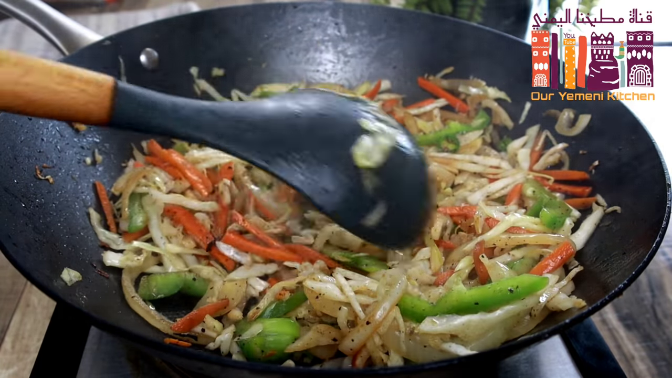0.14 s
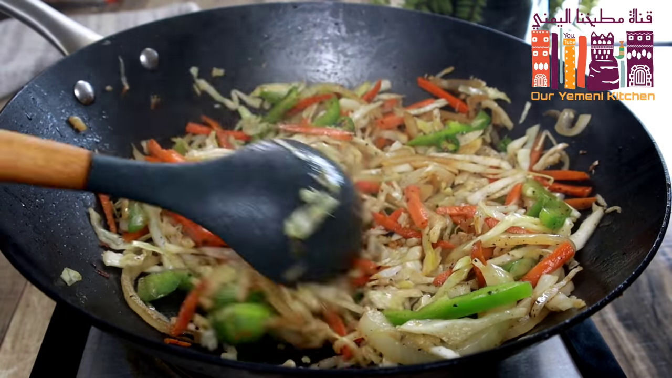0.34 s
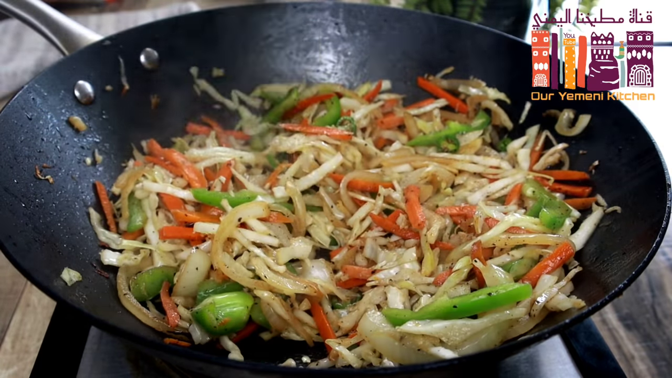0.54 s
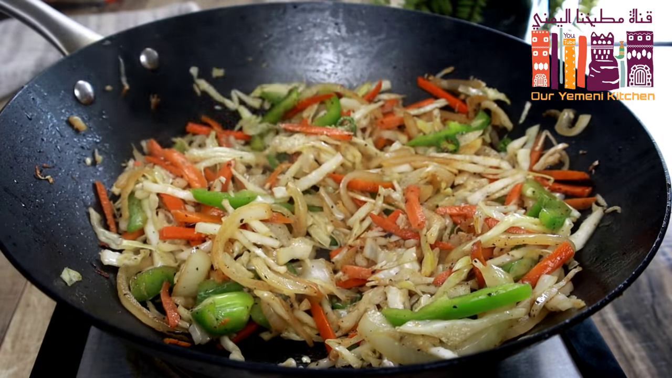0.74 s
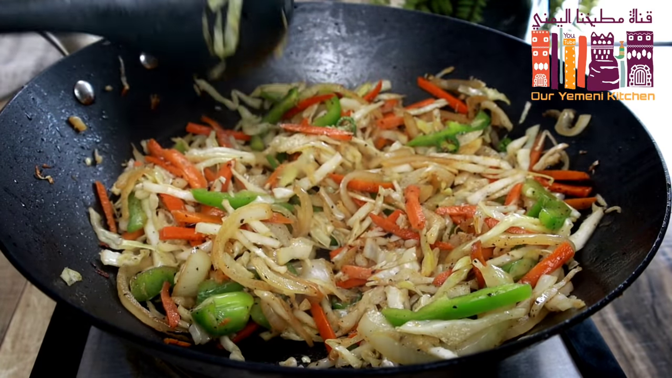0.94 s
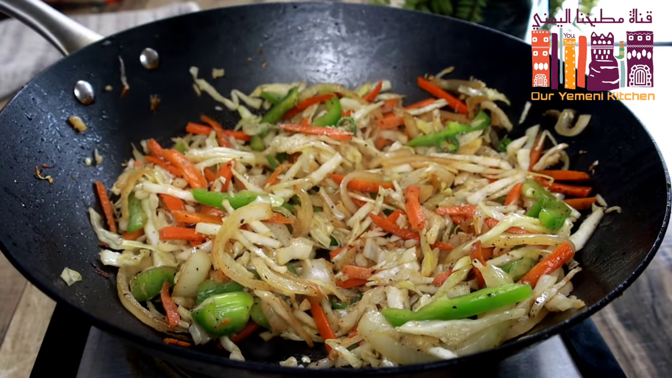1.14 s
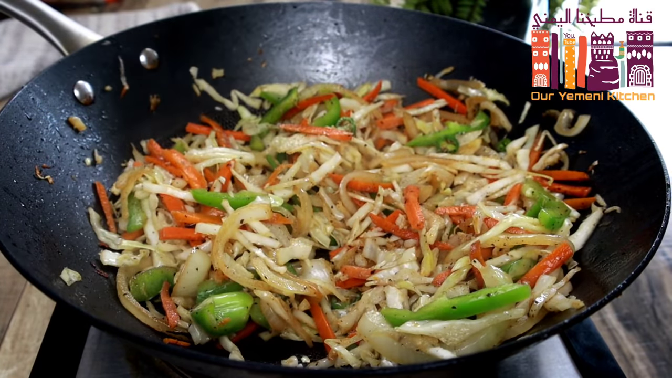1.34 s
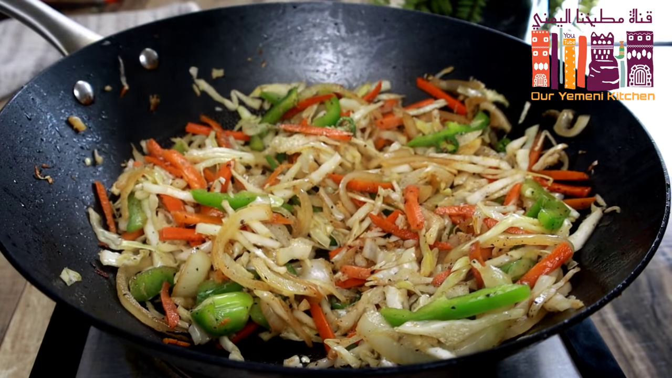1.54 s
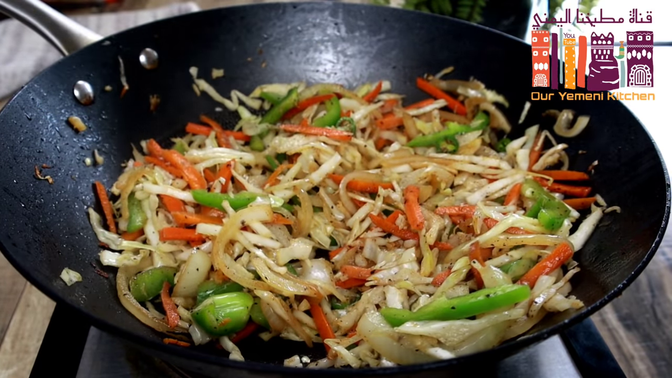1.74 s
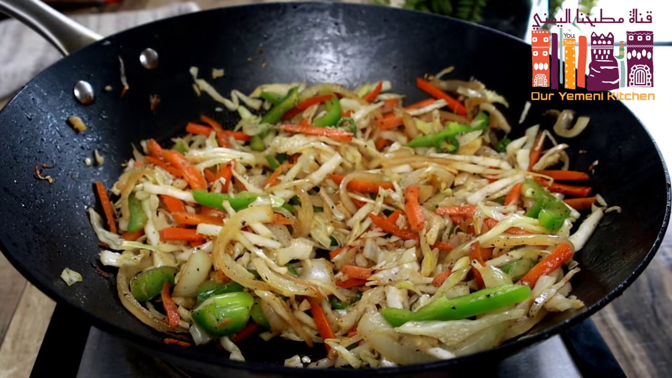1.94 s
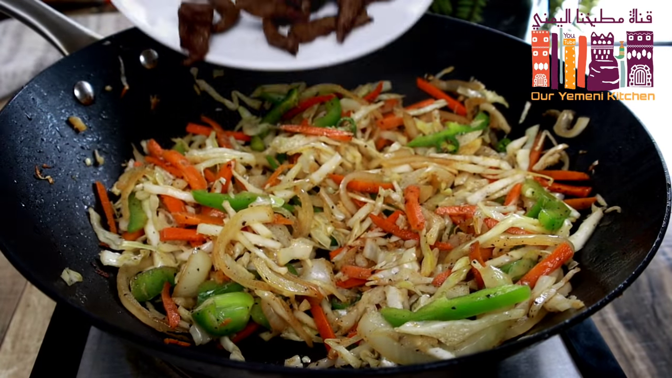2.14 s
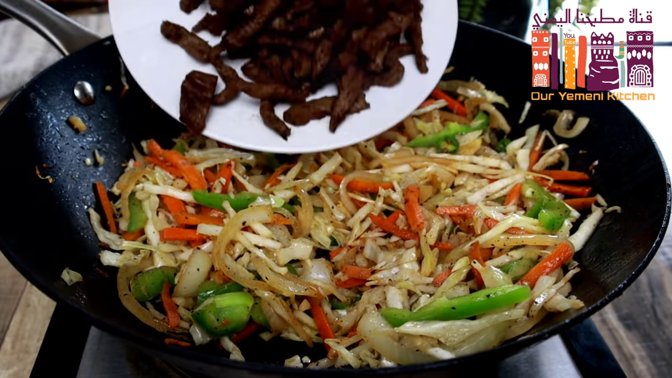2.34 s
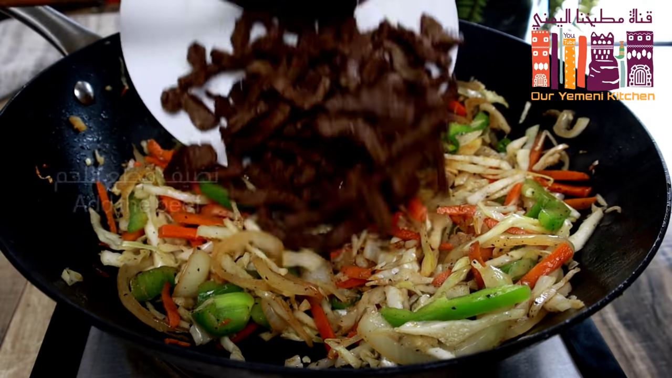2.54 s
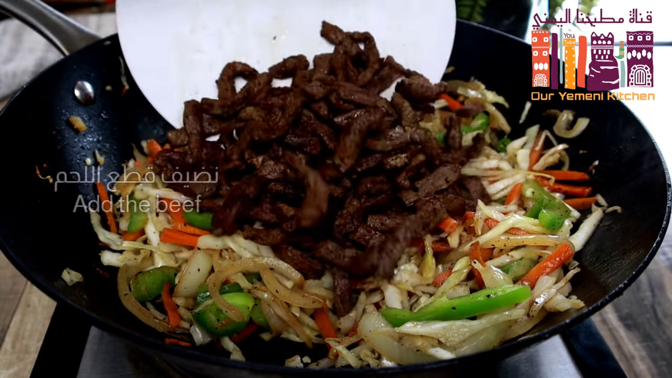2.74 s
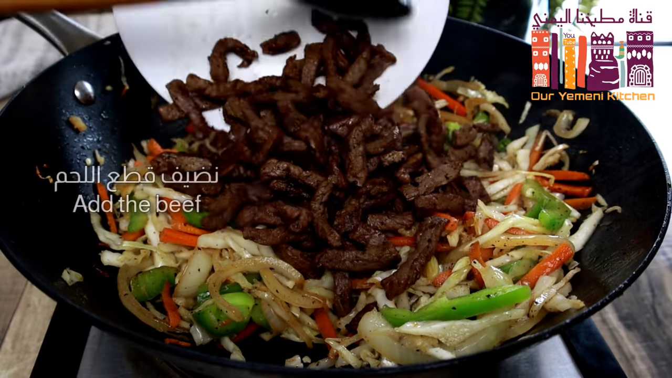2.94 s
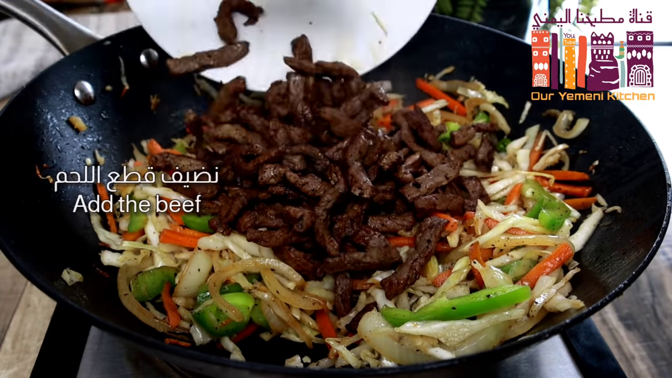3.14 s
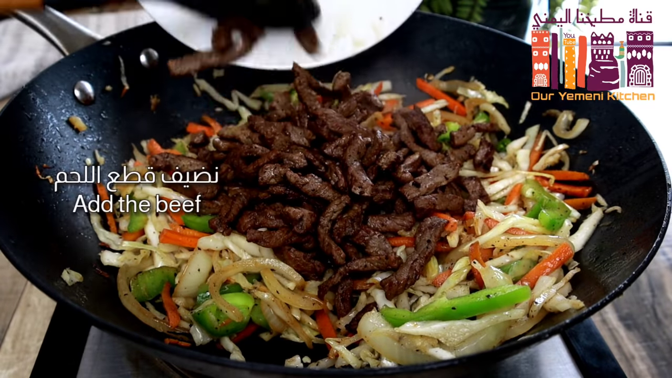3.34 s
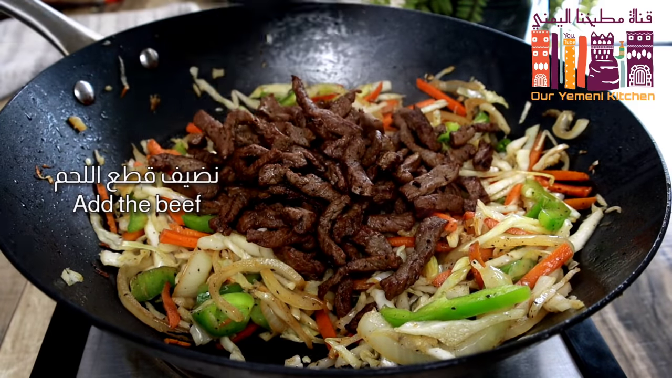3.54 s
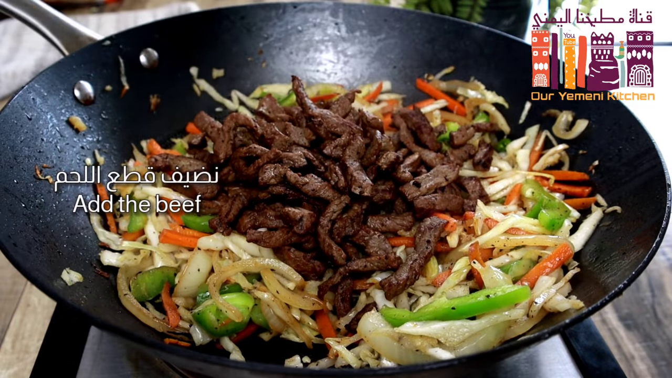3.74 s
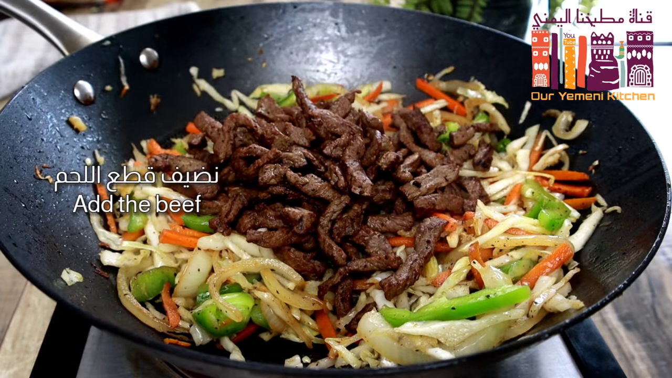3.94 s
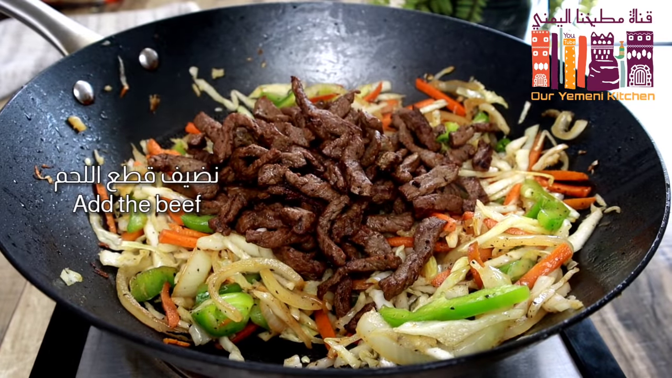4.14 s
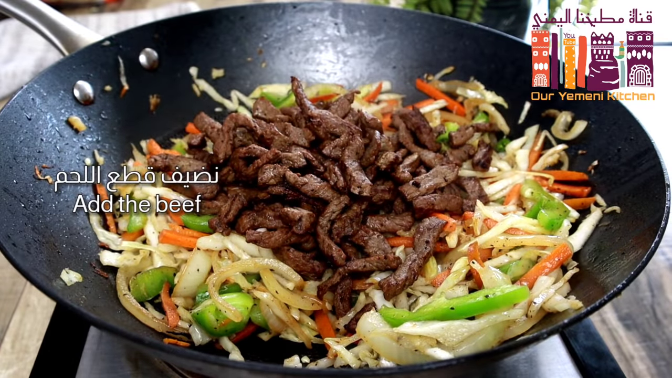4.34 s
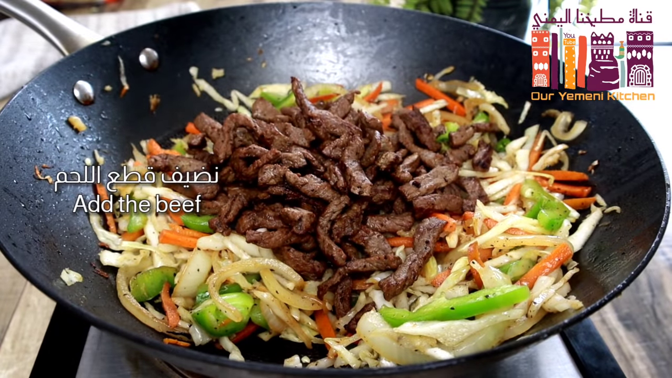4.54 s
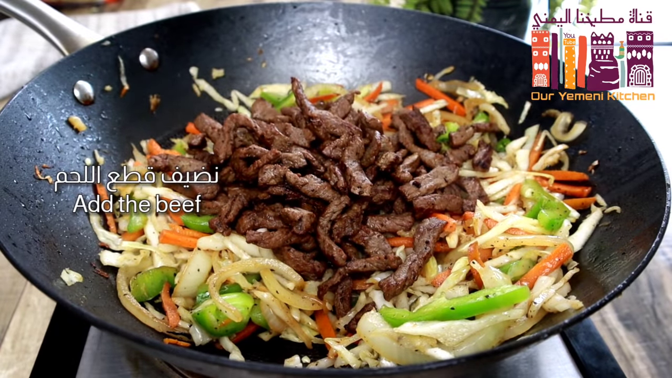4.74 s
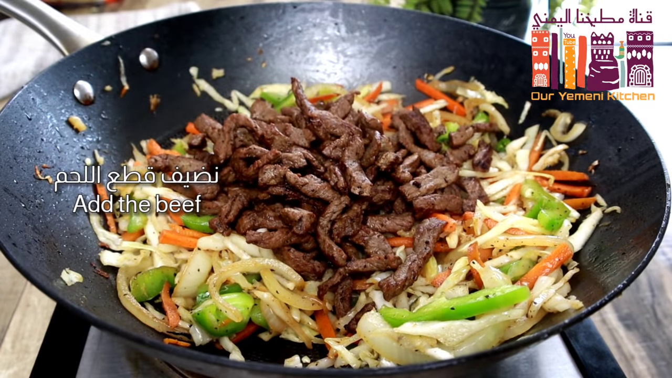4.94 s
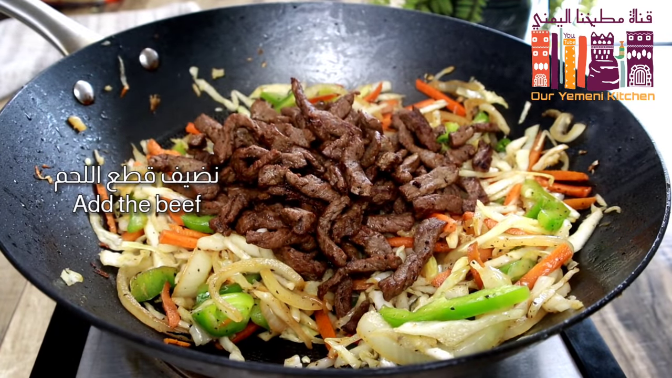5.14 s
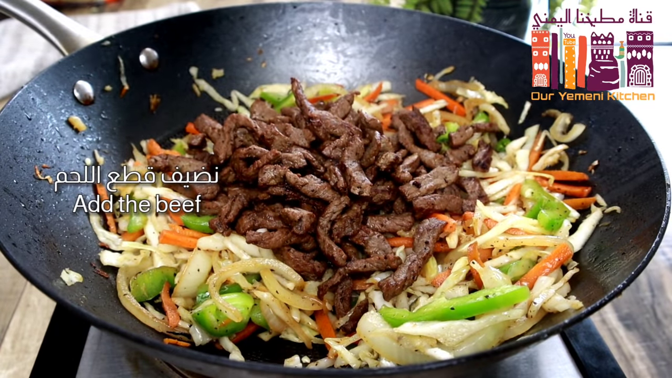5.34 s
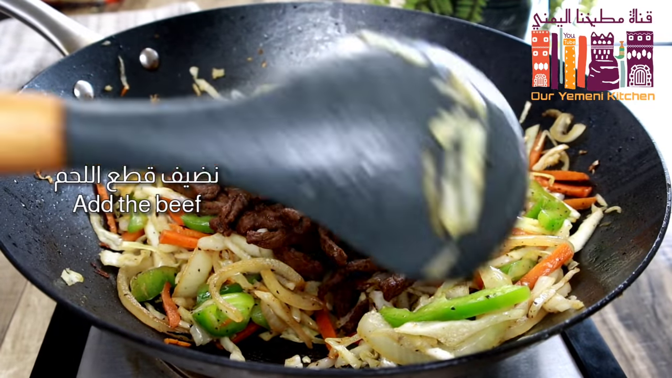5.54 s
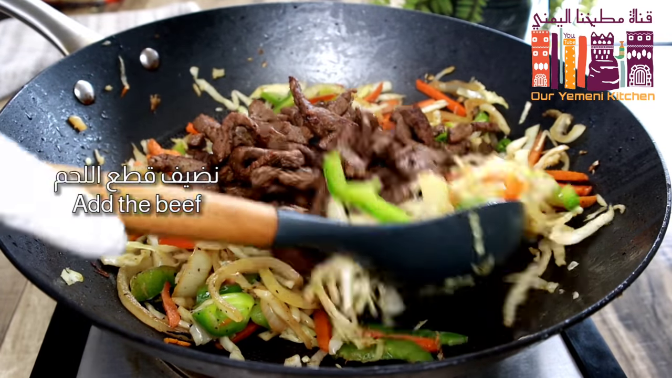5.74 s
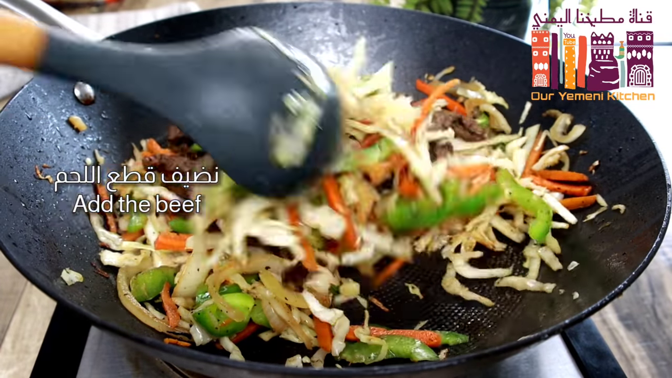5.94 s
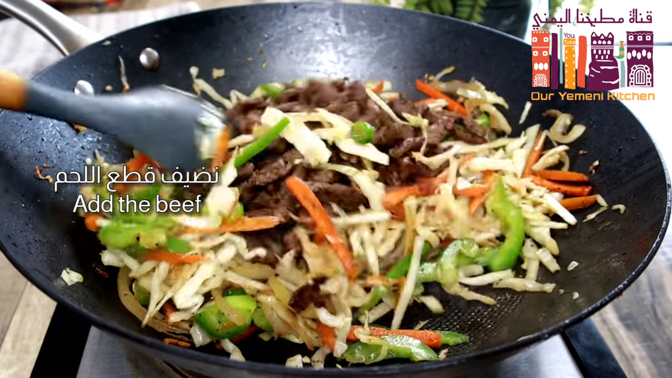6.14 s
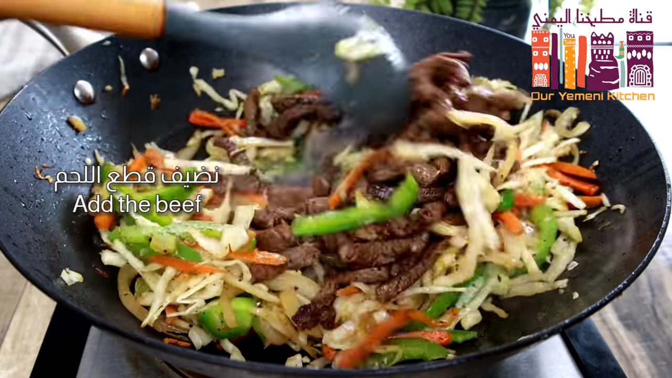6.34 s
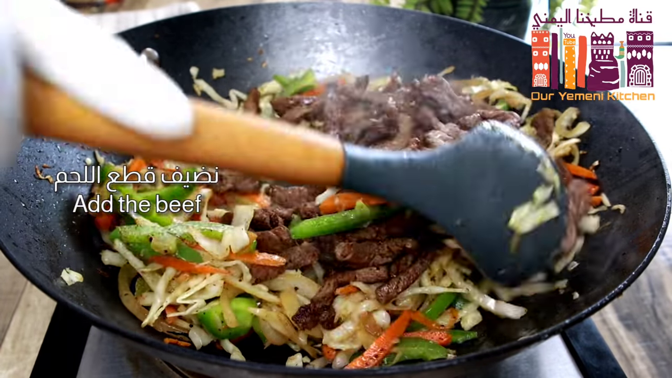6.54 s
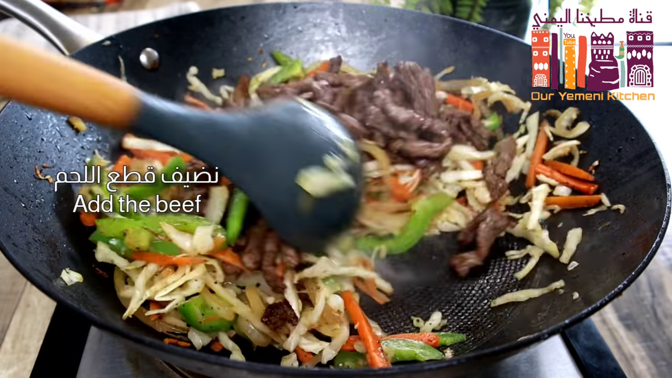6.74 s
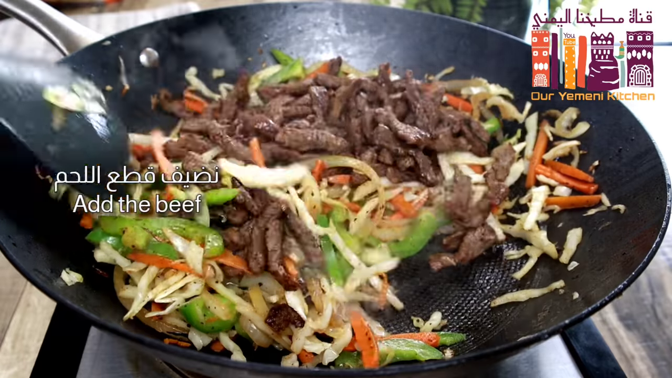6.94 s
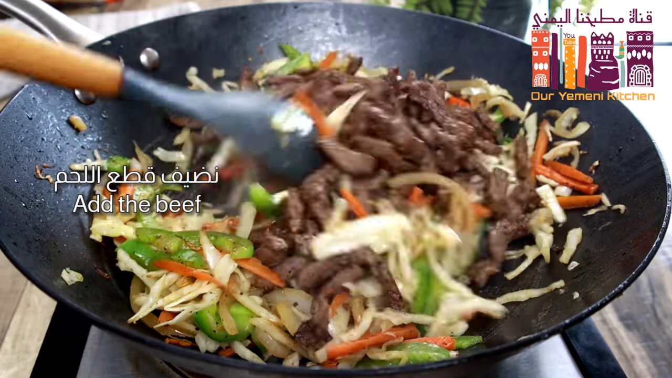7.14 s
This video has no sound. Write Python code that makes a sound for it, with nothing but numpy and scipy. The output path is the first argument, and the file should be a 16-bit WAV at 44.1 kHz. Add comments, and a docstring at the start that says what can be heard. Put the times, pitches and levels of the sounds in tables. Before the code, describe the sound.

Close, crisp frying crackle with sharp oil spits; it eases, swells, eases again, then soft spoon thuds and scrapes bring bursts of fiercer sizzling.

```python
"""In a small kitchen, shredded vegetables fry in a hot wok; beef strips are tipped on, a plastic spoon turns the heap.
Random clicks make the droplets bursting in oil, noise puffs the loud spits, short resonances the bubbles, and faint
sines a thin shimmer. The sizzle flares when wet food meets bare metal: more bursts a second, in changing registers.
Damped sines make the soft thuds of spoon, plate and one spit; filtered clicks scrape, filtered noise is the burner."""
import sys
import numpy as np
from scipy import signal
from scipy.fft import rfft, irfft, next_fast_len
from scipy.io import wavfile

SR = 44100
rng = np.random.default_rng(int(sys.argv[2]) if len(sys.argv) > 2 else 0)


def materialize(psi):
    """Save the field psi as 16-bit PCM at rate SR to the path in sys.argv[1].

    A 1-D psi becomes a single channel; in a 2-D psi each row is a channel.
    """
    bounded = np.clip(np.atleast_2d(psi).T, -1, 1)
    quanta = np.round(bounded * 32767).astype(np.int16)
    wavfile.write(sys.argv[1], SR, quanta)


N = 321489
TIME = np.arange(N) / SR  # s


def sizzle():
    """Harder frying means more bursts a second, heard as wet boiling, bubbling juice, frying and fine spray."""
    fry_gain, boil_gain, spray_gain = vigour()
    crowd = fry_gain / np.exp(np.log(fry_gain).mean())
    snaps = bursts(9000 * crowd, spread_db=2.6, largest_db=13)
    snaps = rms_one(snaps / np.sqrt(crowd))  # a denser crowd is not louder yet
    fizz = from_db(-5.0) * bubbles(per_s=5000, cycles=7.8, low_hz=916, high_hz=13520)
    thin_ring = from_db(-8.5) * shimmer(per_s=200, t60_s=0.16, low_hz=2404, high_hz=10490)
    sound = sizzle_colour(kitchen(snaps, t60_s=0.18, wet_db=1.5) + fizz + thin_ring)

    # split into registers
    boil = below(sound, 1600)
    under_fry = below(sound, 2600)
    under_spray = below(sound, 6000)

    wet = boil_gain * flutter(rate_hz=15, depth_db=0.57) * rms_one(boil)
    wetness = rms_one(boil_gain / fry_gain)
    juice_gain = from_db(-10) * fry_gain * np.sqrt(wetness)  # follows the wet boiling halfway
    juice = juice_gain * flutter(rate_hz=18, depth_db=1.13) * rms_one(under_fry - boil)
    fry_gain = from_db(-3.5) * fry_gain
    fry = fry_gain * flutter(rate_hz=15, depth_db=0.42) * rms_one(under_spray - under_fry)
    spray = spray_gain * flutter(rate_hz=22, depth_db=0.5) * rms_one(sound - under_spray)
    return wet + juice + fry + spray


# Frying vigour while the food lies still, in slow swells and lulls.
# Each row: time in seconds, level in dB before the registers are mixed.
SIMMER = [(0.0, -36), (0.42, -36), (1.0, -36), (1.28, -36), (1.55, -40), (1.8, -41), (2.03, -43),
          (2.3, -41.5), (2.5, -41), (2.8, -36), (3.05, -35.5), (3.7, -36), (4.12, -35), (4.47, -36.5),
          (4.66, -39), (4.95, -40.5), (5.2, -41.5), (5.52, -38), (5.8, -36.5), (6.6, -35.5), (7.29, -33.5)]
# Wet boiling under the heap; it grows late as the beef sheds juice.
# Each row: time in seconds, level against the simmer in dB.
WETNESS = [(0.0, -13), (1.3, -14.3), (2.3, -14), (3.0, -15), (3.9, -14.5), (4.6, -14.5), (5.6, -13.5),
           (7.29, -12.5)]
# Fine oil spray, the treble; lowest once the beef covers the heap.
# Each row: time in seconds, level against the simmer in dB.
SPRAY = [(0.15, 1.8), (0.43, -2), (0.8, 0.5), (1.6, 0.5), (2.55, -0.2), (3.4, -1.4), (5.7, -2.5), (6.6, 0)]
# Wet food lands on bare metal. Each row: start in seconds, rise in seconds, peak in dB (scale of the simmer),
# fall in dB per second, oil spray against the peak in dB, wet boiling against the peak in dB.
FLARES = [(0.48, 0.036, -37, 11.5, 3, -16), (5.824, 0.088, -31.5, 77, 1.5, -15.5),
          (5.989, 0.17, -34, 24, -1, -16.5), (6.21, 0.13, -31.5, 43, -2, -13),
          (6.735, 0.065, -32.8, 65, 1, -14.5), (6.8, 0.08, -35.3, 21, -4.5, -16),
          (7.13, 0.058, -33.5, 22, -2.5, -20)]


def vigour():
    """Simmer and flares add in power; gives the gains of frying, wet boiling and oil spray."""
    simmer_db = over_time(SIMMER)
    fry = from_db(simmer_db) ** 2
    boil = from_db(simmer_db + over_time(WETNESS)) ** 2
    spray = from_db(simmer_db + over_time(SPRAY)) ** 2
    for start_s, rise_s, peak_db, fall_db_per_s, spray_db, boil_db in FLARES:
        power = flare(start_s, rise_s, peak_db, fall_db_per_s)
        fry = fry + power
        boil = boil + power * from_db(boil_db) ** 2
        spray = spray + power * from_db(spray_db) ** 2
    return np.sqrt([fry, boil, spray])


def flare(start_s, rise_s, peak_db, fall_db_per_s):
    """The power of one flare: it swells as the food lands and dies as the moisture boils off."""
    age_s = TIME - start_s
    swell = np.clip(age_s / rise_s, 0, 1) ** 2
    level_db = peak_db - fall_db_per_s * np.maximum(age_s - rise_s, 0)
    return swell * from_db(level_db) ** 2


def bursts(per_s, spread_db, largest_db):
    """Random clicks, many small and few large, each from its own place in the wok; mid and side."""
    born = rng.random(N) < per_s / SR
    size_db = np.minimum(spread_db * rng.exponential(1, N), largest_db)
    sizes = from_db(size_db) * rng.choice([-1, 1], N)
    place = rng.uniform(-1, 1, N) * np.sqrt(3)  # rms 1
    return born * sizes * np.array([np.ones(N), place])


def bubbles(per_s, cycles, low_hz, high_hz, count=40):
    """Bubbles ring for a few cycles; small ones ring higher and shorter, with pitches spaced for an even mix."""
    clicks = bursts(per_s, spread_db=1.0, largest_db=11.0)
    dealt = rng.integers(0, count, N)
    pitches_hz = np.linspace(np.sqrt(low_hz), np.sqrt(high_hz), count) ** 2
    out = np.zeros((2, N))
    for k, hz in enumerate(pitches_hz):
        out += resonance(clicks * (dealt == k), hz, hz / cycles) / hz ** .25
    return rms_one(out)


def shimmer(per_s, t60_s, low_hz, high_hz):
    """Faint decaying sine tones at random times and pitches, a thin ringing shimmer in the sizzle; mid and side."""
    t = TIME[:SR // 8]
    out = np.zeros((2, N + len(t)))
    for when, pitch, strength, place in rng.random((int(per_s * N / SR), 4)):
        hz = low_hz * (high_hz / low_hz) ** pitch
        tone = strength * np.sin(2 * np.pi * hz * t) * from_db(-60 * t / t60_s)
        at = int(when * N)
        out[:, at:at + len(t)] += tone * np.array([[1], [np.pi * (place - .5)]])
    return rms_one(out[:, :N])


def flutter(rate_hz, depth_db):
    """A gain that wanders at random about 1."""
    knots = rng.standard_normal(N // 100)
    return from_db(depth_db * np.interp(TIME * rate_hz, np.arange(len(knots)), knots))


# Single loud spits of oil. Each row: start in seconds, crisp snap in dB (before echoes and colour),
# wet pop in dB, pitch of the pop in Hz.
SPITS = [(0.1646, -5, -20, 3200), (0.375, -22, -23, 900), (0.8309, -4, -24, 3200),
         (0.906, -15, -16.5, 2800), (0.9957, -8.5, -11, 3200), (1.1398, -7, -20, 3200),
         (1.2355, -8.5, -22, 1400), (1.3027, -7.5, -20, 3200), (1.376, -11, -17, 2400),
         (1.517, -11, -25, 3200), (1.5507, -10.5, -25, 3200), (1.8764, -15, -14.5, 2200),
         (2.546, -10.5, -28, 3200), (2.859, -22, -24, 900), (2.917, -15, -16, 2800),
         (3.0628, -11, -19, 3200), (3.089, -10, -21, 3200), (3.348, -10, -21, 1500),
         (3.9686, -7, -18, 3200), (4.4925, -7.5, -19, 3200), (5.670, -11.5, -19, 3200),
         (5.8835, -9, -18, 1200), (5.9176, -6.5, -14, 3200), (6.0425, -10, -17, 3200),
         (6.273, -7, -11, 3200)]


def spits():
    """A large drop explodes with a crisp snap; its steam adds a duller pop, deeper when buried in the food."""
    snaps, pops = np.zeros((2, 2, N))
    for start_s, snap_db, pop_db, pop_hz in SPITS:
        snap = unit_energy(band(puff(t60_s=.0016), 4500, 15000))
        pop = unit_energy(band(puff(t60_s=.0012), pop_hz * .35, pop_hz * 1.8))
        at = round(start_s * SR)
        snaps[:, at:at + snap.shape[1]] += from_db(snap_db) * snap
        pops[:, at:at + pop.shape[1]] += from_db(pop_db) * pop * [[1], [.5]]
    return sizzle_colour(kitchen(snaps, t60_s=0.21, wet_db=-9)) + pops


def puff(t60_s):
    """A spurt of noise that dies within milliseconds; mid and side, each of unit energy."""
    t = TIME[:SR // 25]
    return unit_energy(rng.standard_normal((2, len(t))) * from_db(-60 * t / t60_s))


# Burst spectrum common to both ears. Each row: frequency in Hz, level in dB per Hz.
BURST_MID = [(300, -24), (400, -20), (470, -19.5), (580, -13), (1000, -12.5), (1480, -10), (1640, -4.5),
             (2400, -2.5), (3200, 2), (4100, 2.5), (5500, -1), (9000, -5.5), (11500, -3.5), (12500, -6),
             (15000, -39)]
# Burst spectrum of the difference between the ears. Each row: frequency in Hz, level in dB per Hz.
BURST_SIDE = [(40, -52), (150, -27.5), (500, -28), (1400, -20), (2200, -8), (3200, -0.5), (5200, -0.5),
              (7500, -5), (9200, -3), (11200, 2), (12200, -0.5), (13400, -5), (15000, -27)]
# Narrow peaks and dips in the colour of the sizzle, from the bowl and nearby reflections.
# Each row: frequency in Hz, width in Hz, lift in dB.
PEAKS_AND_DIPS = [(355, 20, 4), (388, 20, 3.5), (522, 35, 4), (712, 25, 2.5), (797, 45, 4.5), (1036, 45, 3),
                  (1232, 45, 5.5), (1364, 35, 2), (1770, 110, 2.5), (1930, 70, -2), (2062, 55, 4),
                  (2255, 60, 4.5), (3083, 70, 2)]


def sizzle_colour(x):
    """Broad spectra of mid and side; bowl and nearby reflections add narrow peaks and dips to the mid."""
    mid, side = coloured(x[0], BURST_MID), coloured(x[1], BURST_SIDE)
    ripple = sum((from_db(lift_db) - 1) * resonance(mid, hz, width_hz) for hz, width_hz, lift_db in PEAKS_AND_DIPS)
    return np.array([mid + ripple, side])


def kitchen(clicks, t60_s, wet_db):
    """Every click comes from another spot, so the echoes blur into noise that dies away behind them."""
    r = from_db(-120 / (t60_s * SR))  # decay of power per sample
    energy = signal.lfilter([0, 1 - r], [1, -r], clicks[0] ** 2 + 1e-20)
    return clicks + from_db(wet_db) * np.sqrt(energy) * rng.standard_normal((2, N))


# Soft thuds: knocks of spoon and plate, and at 1.38 s the dull body of a spit.
# Each row: start in seconds, level in dB, pitch in Hz, rise in seconds, t60 in seconds.
THUDS = [(1.3785, -43.5, 520, .0005, .012), (1.38, -56, 240, .002, .03), (2.415, -57, 105, .003, .04),
         (2.416, -50, 215, .001, .013), (2.962, -56, 160, .008, .06), (3.494, -51, 290, .001, .02),
         (5.703, -42, 590, .001, .075), (5.705, -42, 1230, .001, .06), (5.707, -44.5, 780, .002, .09),
         (5.729, -51, 310, .002, .09), (5.757, -50, 540, .003, .05), (5.769, -49.5, 145, .007, .09),
         (5.79, -45.5, 620, .001, .035), (5.797, -56, 150, .008, .2), (5.834, -51, 190, .003, .06),
         (5.847, -48, 270, .007, .07), (6.078, -47, 750, .001, .05), (6.205, -53, 100, .008, .15),
         (6.221, -42.5, 1050, .001, .03), (7.184, -53, 170, .005, .13), (7.195, -44, 1050, .012, .15)]


def thuds(rustle_db, contact_db):
    """Each is a dull contact click, then a damped sine with a little rustle of noise round its pitch."""
    out, t = np.zeros((2, N)), TIME[:SR // 4]
    for start_s, level_db, hz, rise_s, t60_s in THUDS:
        contact = band(1.0 * (t == 0), hz / 3, hz * 2)
        rustle = from_db(rustle_db) * rms_one(band(rng.standard_normal((2, len(t))), hz / 2, hz * 2))
        envelope = np.minimum(t / rise_s, 1) * from_db(-60 * np.maximum(t - rise_s, 0) / t60_s)
        thud = (np.sin(2 * np.pi * hz * t) * [[1], [0]] + rustle) * envelope
        thud[0] += from_db(contact_db) * contact / contact.max()
        at = round(start_s * SR)
        out[:, at:at + len(t)] += from_db(level_db) * thud[:, :N - at]
    return out


# The spoon pushes food along the metal. Each row: start in seconds, length in seconds, peak level in dB.
STROKES = [(5.678, 0.21, -57), (6.0, 0.51, -68), (6.67, 0.25, -61), (7.107, 0.16, -53)]


def scrape(low_hz, high_hz, rock_db):
    """The spoon presses and lets go, slips over the metal in small dull jerks and rocks the wok on its stand."""
    pressure = np.zeros(N)
    for start_s, length_s, level_db in STROKES:
        pressure += from_db(level_db) * np.sin(np.pi * np.clip((TIME - start_s) / length_s, 0, 1))
    slips = kitchen(bursts(860, spread_db=5.0, largest_db=11), t60_s=.25, wet_db=-6)
    rub = rms_one(band(slips, low_hz, high_hz))
    rock = rms_one(band(slips, 70, 210))
    return pressure * (rub + from_db(rock_db) * rock) * [[1], [.25]]


# Spectrum of the burner rumble. Each row: frequency in Hz, relative level in dB per Hz.
BURNER = [(20, -12), (40, -5.5), (62, 6), (85, -1.5), (125, -1.5), (180, -10), (240, -2), (320, -33),
          (600, -8.5), (2000, -45)]
BURNER_DB = -65.5  # rms of the mid


def burner():
    """A steady low rumble of filtered noise; its deepest part is nearly the same in both ears."""
    mid, side = rms_one(coloured(rng.standard_normal((2, N)), BURNER))
    return from_db(BURNER_DB) * np.array([mid, 0.051 * side + 0.5 * band(side, 185, 2000)])


def from_db(db):
    """Decibels to gain."""
    return 10 ** (np.asarray(db) / 20)


def over_time(points):
    """Straight lines through (seconds, value) rows."""
    return np.interp(TIME, *np.transpose(points))


def rms_one(x):
    """Scale so that the first (mid) channel has rms 1."""
    return x / np.sqrt(np.mean(np.atleast_2d(x)[0] ** 2) + 1e-20)


def unit_energy(x):
    """Scale each channel so that its squares sum to 1."""
    return x / np.sqrt(np.sum(x ** 2, axis=-1, keepdims=True))


def coloured(x, points):
    """Filter by a (Hz, dB) spectrum, interpolated over log frequency."""
    size = next_fast_len(N + SR // 10)
    hz, db = np.transpose(points)
    bins_hz = np.maximum(np.arange(size // 2 + 1) * SR / size, 1)
    gain = from_db(np.interp(np.log(bins_hz), np.log(hz), db))
    return irfft(rfft(x, size) * gain, size)[..., :N]


def band(x, low_hz, high_hz):
    """A gentle band-pass."""
    sos = signal.butter(2, [low_hz, min(high_hz, .45 * SR)], "band", fs=SR, output="sos")
    return signal.sosfilt(sos, x + 1e-18)


def below(x, hz):
    """The part of a sound under a crossover, in phase with the rest."""
    return signal.sosfiltfilt(signal.butter(3, hz, fs=SR, output="sos"), x)


def resonance(x, hz, width_hz):
    """One two-pole resonance with gain 1 on top."""
    r = np.exp(-np.pi * width_hz / SR)
    zeros = np.array([1, 0, -1]) * (1 - r * r) / 2
    poles = [1, -2 * r * np.cos(2 * np.pi * hz / SR), r * r]
    return signal.lfilter(zeros, poles, x + 1e-18)


# Left minus right. Each row: frequency in Hz, difference in dB.
BALANCE = [(300, 0), (1500, -0.5), (2700, -2), (4200, -0.5), (6000, 1), (11000, 1), (13000, 0)]


def scene():
    """All sources as mid and side, opened out to left and right."""
    food = sizzle() + spits()
    low_sounds = thuds(rustle_db=-9, contact_db=1) + scrape(low_hz=241, high_hz=1010, rock_db=-4)
    mid, side = food + low_sounds + burner()
    side = side + .25 * np.gradient(mid)  # the wok stands slightly left, so the left ear hears it first
    half_tilt = np.array(BALANCE) * [1, .5]
    left = coloured(mid + side, half_tilt)
    right = coloured(mid - side, half_tilt * [1, -1])
    return np.array([left, right])


CUTOFF_HZ = 15050


def record(dry):
    """The top is cut steeply by an elliptic low-pass."""
    return signal.sosfilt(signal.ellip(12, .1, 80, CUTOFF_HZ, fs=SR, output="sos"), dry)


dry = scene()
out = record(dry)
materialize(out)
```